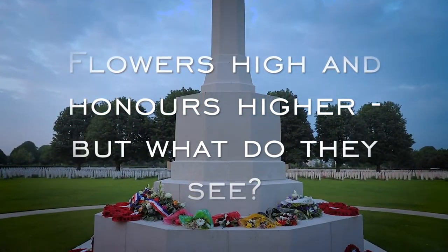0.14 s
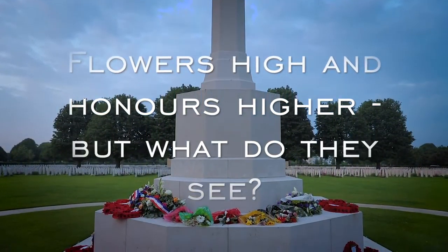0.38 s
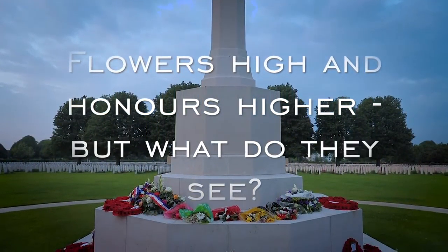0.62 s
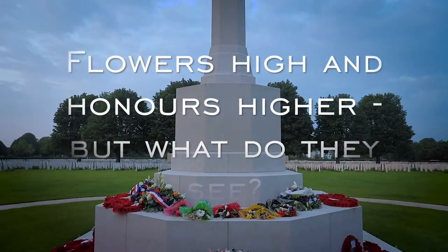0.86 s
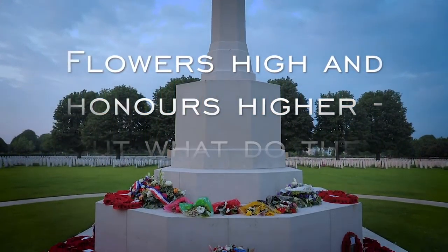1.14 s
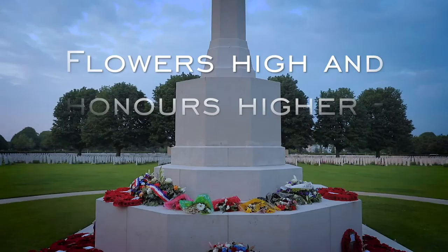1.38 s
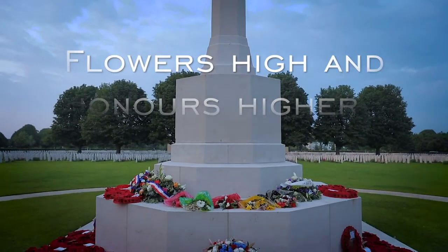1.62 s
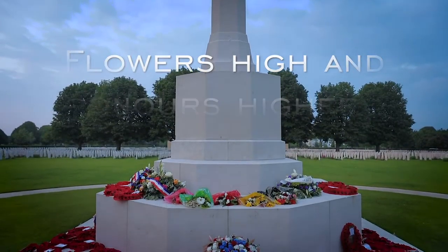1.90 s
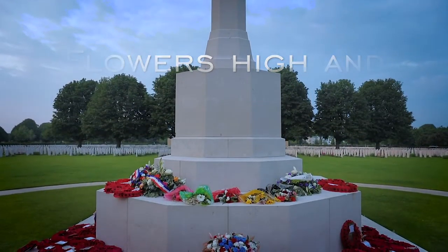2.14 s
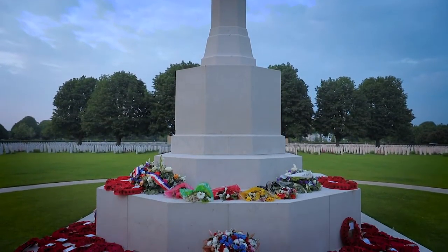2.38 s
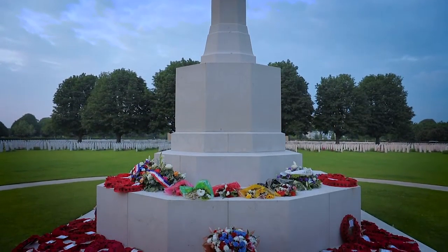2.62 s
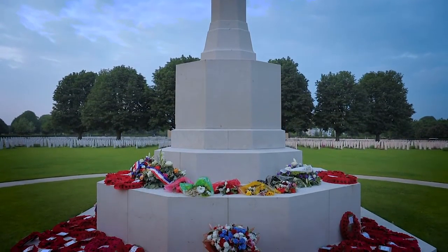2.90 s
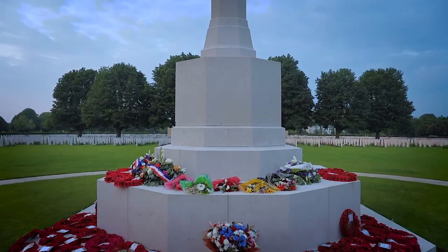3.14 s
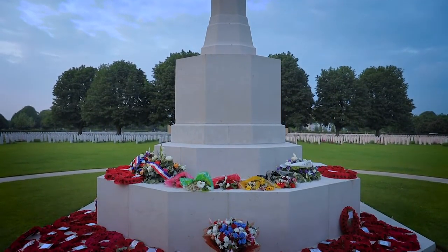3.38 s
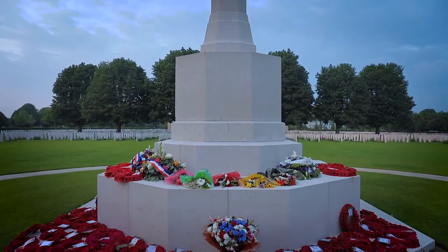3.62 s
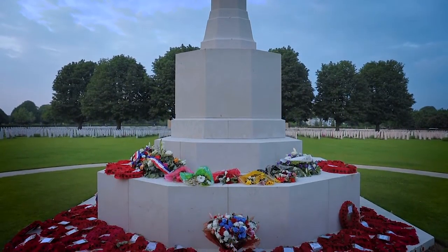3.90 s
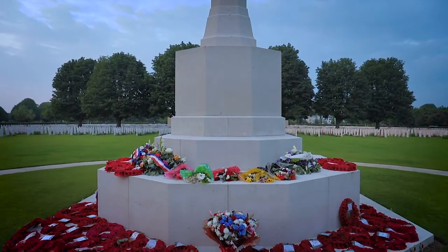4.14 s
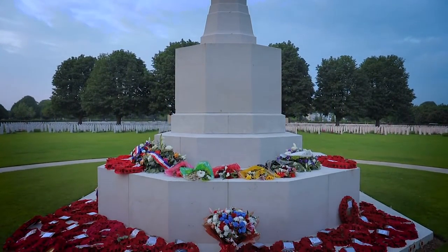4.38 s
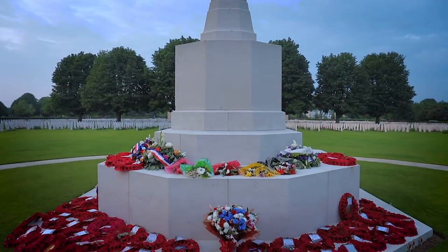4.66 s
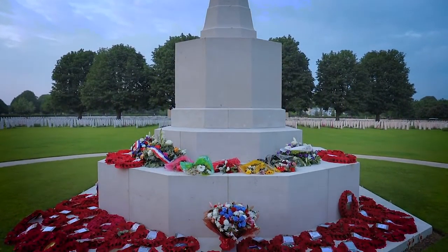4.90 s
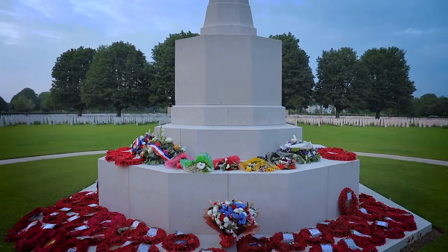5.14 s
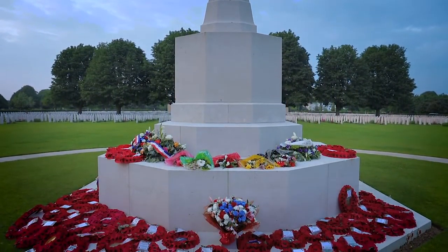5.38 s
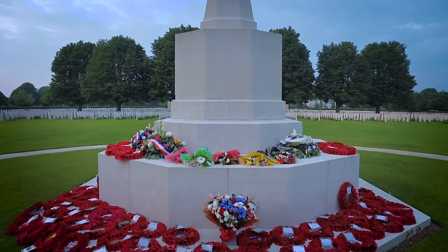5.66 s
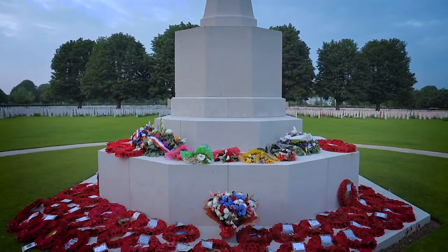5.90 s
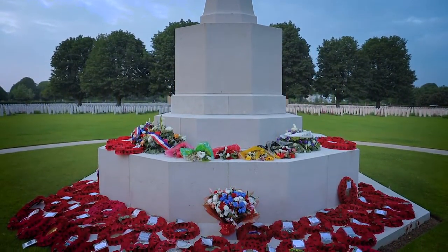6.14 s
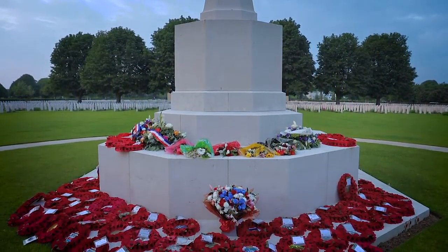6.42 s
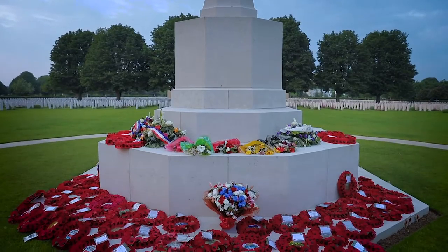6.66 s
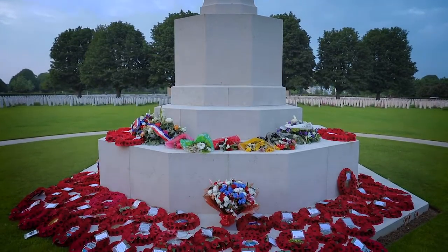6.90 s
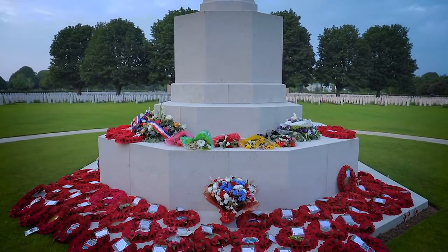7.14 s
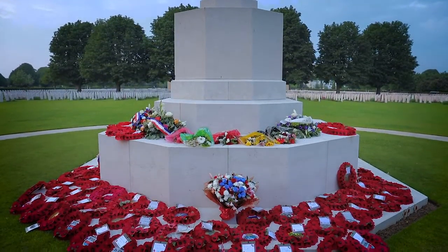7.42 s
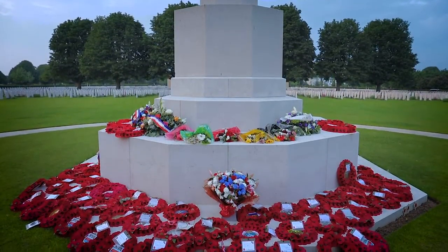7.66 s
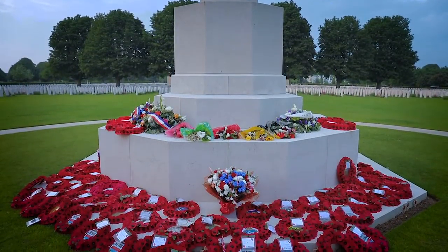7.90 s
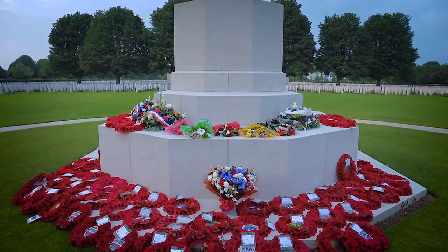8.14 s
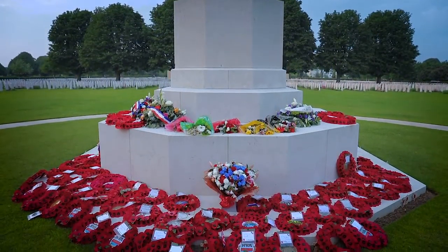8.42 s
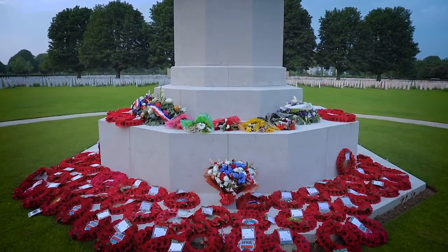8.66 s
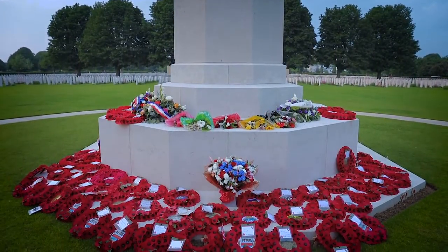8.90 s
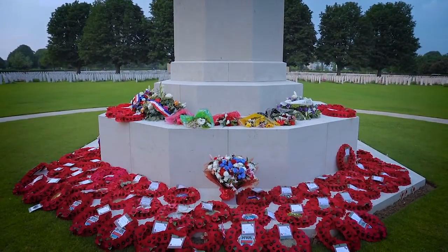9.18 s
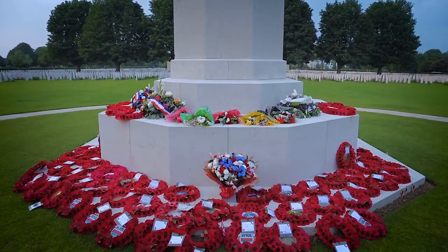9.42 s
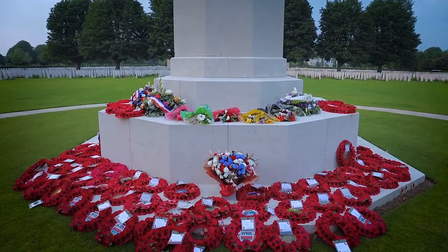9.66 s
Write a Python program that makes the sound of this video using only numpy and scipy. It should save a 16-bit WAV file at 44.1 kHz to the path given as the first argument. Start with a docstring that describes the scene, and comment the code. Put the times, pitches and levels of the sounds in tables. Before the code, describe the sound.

A steady, muted hiss of distant traffic and leaves runs throughout. At 0.2-0.6 s thin high notes sound with two hollow wooden knocks; a buzz and harsh chacks follow to 1.1 s. From 1.25 to 1.75 s come three wiggling syllables with buzzy tails, then crisp snaps. Two bright, very short pinks ring at 2.3 and 2.45 s beside a stronger knock. Two falling rattles come at 2.9-3.2 s, with more knocks, then clustered whistles until 4.1 s over faint hoarse calling. A strong dull snap lands at 4.2 s, followed by a sparser second. Chirps run 5.5-5.8 s over far chatter, throbbing trills 6.0-6.5 s, and the sharpest dull snap at 6.6 s. Dense whistles fill 6.9-7.4 s, then a loud chirp and chacks to 7.75 s. Sparse whistles, snaps and knocks follow, with quick flicked notes at 9.6 s. Only short diffuse scatter surrounds the calls.

```python
"""Among trees at dawn, songbirds overlap: whistles, buzzy trills and harsh chacks, with fainter notes and chatter.
Whistles are near sines along pitch lines, buzzes add modulation, and chacks and ticks are pulses through
throat resonances. Something hollow and wooden knocks now and then as decaying modes; distant traffic and
leaves hiss below as coloured noise. Trunks and foliage scatter the calls as a short noise tail, without
the knocks, a far hoarse calling and the hiss; the microphone chain cuts the bass and the top."""
import sys
import numpy as np
from scipy import signal
from scipy.fft import rfft, irfft
from scipy.io import wavfile
from scipy.ndimage import uniform_filter1d

SR = 44100
rng = np.random.default_rng(int(sys.argv[2]) if len(sys.argv) > 2 else 0)


def field_ratio(decibels):
    """Amplitude ratio for a level in dB (20 dB per decade); scalars and array-likes work."""
    return 10 ** (np.asarray(decibels, dtype=float) / 20)


def int16_out(signal):
    """Quantize to a 16-bit WAV file."""
    q = np.round(np.clip(np.atleast_2d(signal).T, -1, 1) * 32767)
    wavfile.write(sys.argv[1], SR, q.astype(np.int16))


N = 431738   # length in samples


def rms_one(x):
    """Normalisation: scale to unit root-mean-square."""
    return x / np.sqrt(np.mean(x ** 2) + 1e-20)


def add(out, s, x):
    """Superposition: mix x into out from s seconds on."""
    i = int(s * SR)
    out[i:i + len(x)] += x[:N - i]


def resonate(x, hz, width_hz):
    """Damped resonance: a two-pole filter with unit gain at its peak."""
    r = np.exp(-np.pi * width_hz / SR)
    zeros = np.array([1, 0, -1]) * (1 - r * r) / 2
    poles = [1, -2 * r * np.cos(2 * np.pi * hz / SR), r * r]
    return signal.lfilter(zeros, poles, x)


def drift(rate_hz, size):
    """Random fluctuation: white noise through a double low-pass, scaled to rms 1."""
    r = np.exp(-2 * np.pi * rate_hz / SR)
    settled = signal.lfilter([1], [1, -2 * r, r * r], rng.standard_normal(size + 4000))[4000:]
    return rms_one(settled)


def shaped(shape, s, length, first_hz, second_hz, db):
    """Scaling of a contour: stretch a note shape to its time, pitches and level."""
    return [(s + a * length, first_hz + b * (second_hz - first_hz), db + c) for a, b, c in shape]


def note(rows, throb=0, depth=0, swing_hz=0, edge=0.0024, waver_hz=30, upper_db=-17, sharp=1, sets_in=.002):
    """Frequency and amplitude modulation: the syrinx sings a near sine; in a buzz each throb is a sweep."""
    s, hz, db = np.transpose(rows)
    t = np.arange(s[0], s[-1], 1 / SR)
    glide = uniform_filter1d(np.interp(t, s, hz), size=110, mode="nearest")   # corners are rounded
    beat = 2 * np.pi * throb * (t - s[0]) + 0.34 * drift(39, size=len(t))
    buzz = np.clip((t - s[0]) / sets_in, 0, 1) ** 2
    pitch = glide + buzz * swing_hz * np.sin(beat) + waver_hz * drift(88, size=len(t))
    waver_db = 1.8 + depth   # a buzz is a little less steady
    level = field_ratio(np.interp(t, s, db) + waver_db * drift(110, size=len(t)))
    level = level * (1 - np.clip(depth * buzz, 0, 1) * np.cos(beat)) ** sharp
    fade = np.clip(np.minimum(t - s[0], s[-1] - t) / edge, 0, 1)
    phase = 2 * np.pi * np.cumsum(pitch) / SR
    # low notes carry a faint, breathy upper voice about a fifth above
    lowness = np.clip((3000 - glide) / 300, 0, 1)
    upper = field_ratio(upper_db) * lowness * np.sin(1.45 * phase + 2.8 * drift(120, size=len(t)))
    return np.sqrt(2) * level * fade * (np.sin(phase) + upper)


# Whistle contours. Each row: share of the length, share of the way from first to second pitch,
# level offset in dB.
SLIDE = [(0, 0, -6), (.5, .5, 0), (1, 1, -6)]   # a straight glide
SCOOP = [(0, 1.2, -8), (.22, 0.071, -0.5), (1, 1, -1)]   # scoops up to the first pitch, then sinks at even strength
ARCH = [(0, 0, -10.5), (.3, .7, -6.5), (.5, 0.93, -5.5), (.7, .7, -1), (1, 0.11, -8)]     # up and down again, loudest on the way down
SWOOP = [(0, 0.053, -22.5), (.62, 1, 4.5), (1, .95, -14)]   # falls, then levels out
FLICK = [(0, 0.032, -16), (.73, 0.23, -1), (1, 1, 2.5)]   # creeps up, then flips high
# Whistles of each contour. Each row: start in seconds, length in seconds, first pitch in Hz,
# second pitch in Hz, level in dB.
SLIDES = [(0.956, 0.025, 2564, 2740, -44), (2.077, 0.13, 2510, 4940, -42.5),
          (2.56, 0.045, 6000, 7030, -47.5), (2.739, 0.015, 2633, 2630, -28.5),
          (2.768, 0.016, 2700, 2580, -42.5), (3, 0.057, 3520, 3020, -50), (3.223, 0.014, 1820, 1300, -37.5),
          (3.623, 0.033, 2604, 2050, -46), (3.715, 0.023, 2500, 3700, -38), (3.796, 0.025, 3510, 3280, -33),
          (3.843, 0.046, 2990, 3230, -34), (3.866, 0.014, 1775, 1580, -29.5),
          (4.058, 0.083, 5850, 5000, -43), (4.338, 0.08, 3100, 3345, -44), (6.325, 0.021, 3300, 2520, -35),
          (6.345, 0.038, 3040, 3140, -42), (6.687, 0.074, 8820, 7500, -45), (6.768, 0.072, 8000, 7760, -48),
          (6.936, 0.019, 2130, 2750, -34.5), (6.962, 0.037, 2236, 2750, -28.5),
          (7.021, 0.021, 2180, 3700, -38), (7.053, 0.015, 3700, 5100, -44), (7.088, 0.047, 3100, 2664, -35),
          (7.194, 0.042, 2440, 2830, -35), (7.257, 0.045, 2900, 3060, -39.5),
          (7.354, 0.021, 2940, 2410, -26.5), (8.417, 0.033, 3900, 2700, -39),
          (8.433, 0.13, 2620, 2090, -37.5), (9.082, 0.13, 3240, 3810, -42.5),
          (9.219, 0.056, 5370, 6300, -50), (9.585, 0.027, 2780, 2330, -38.5),
          (9.613, 0.029, 2570, 2240, -29), (9.616, 0.025, 2810, 2700, -34.5),
          (9.643, 0.013, 2640, 2070, -33)]
SCOOPS = [(3.732, .024, 2695, 2294, -28.5), (3.773, 0.022, 2700, 2265, -27),
          (3.813, 0.0286, 2330, 1970, -31)]
ARCHES = [(0.202, 0.049, 5360, 6330, -33), (0.253, 0.045, 5210, 5980, -34),
          (2.093, 0.05, 5420, 6350, -44.5), (3.429, 0.062, 6040, 6900, -43.5),
          (3.478, 0.066, 6330, 7470, -46), (3.758, 0.019, 3950, 4090, -32),
          (3.987, 0.037, 5170, 6000, -39.5), (4.021, 0.052, 5350, 5900, -38.5),
          (5.901, 0.12, 2970, 3300, -42.5), (6.715, 0.074, 7530, 8230, -45),
          (6.904, 0.0257, 2113, 2670, -34), (7.056, 0.035, 3000, 3385, -26),
          (6.98, 0.073, 3850, 4450, -43.5), (7.213, 0.053, 4426, 4870, -45.5),
          (7.292, 0.049, 3210, 3680, -21.5)]
SWOOPS = [(2.627, 0.1, 7400, 5660, -38.5), (3.547, 0.061, 8100, 6500, -42.5),
          (3.6, 0.05, 8250, 6360, -35.5)]
FLICKS = [(9.552, .028, 1727, 3210, -30.5), (9.68, 0.025, 1615, 3050, -31)]


def whistles():
    """Pure-tone phonation: each whistle follows one of five pitch contours."""
    out = np.zeros(N)
    groups = (SLIDE, SLIDES), (SCOOP, SCOOPS), (ARCH, ARCHES), (SWOOP, SWOOPS), (FLICK, FLICKS)
    for shape, table in groups:
        for row in table:
            add(out, row[0], note(shaped(shape, *row)))
    return out


# A lead note, two quick dips, a climb. Each row: time in seconds before stretching,
# share from dip to lead pitch, level offset in dB.
ZIGZAG = [(0, 0.65, -7.5), (.024, 1, -6), (.031, -.1, -3.5), (.041, 0.55, 4), (.044, 1.0, -11),
          (.048, .1, 4.5), (.07, 1.7, -23)]
# The syllables. Each row: start in seconds, dip pitch in Hz, lead pitch in Hz, level in dB.
ZIGZAGS = [(1.252, 2000, 3100, -35.5), (1.442, 1537, 3250, -34), (1.62, 2105, 2900, -30.5)]


def zigzags():
    """Rapid frequency modulation: syllables that dip twice and climb."""
    out = np.zeros(N)
    for s, dip_hz, lead_hz, db in ZIGZAGS:
        add(out, s, note(shaped(ZIGZAG, s, 0.94, dip_hz, lead_hz, db)))
    return out


# A pitch that jumps up and sags. Each row: share of the length, share of the top pitch, level offset in dB.
BURR = [(0, .88, -5.5), (.22, 1, -1.5), (.7, 0.93, 1), (1, 0.92, -5)]
# Buzzy notes. Each row: start in seconds, length in seconds, top of the glide in Hz, level in dB,
# throbs per second, pitch swing in Hz.
BURRS = [(0.833, .12, 6240, -40, 110, -420), (1.331, 0.045, 3900, -37, 62, -400),
         (1.5, 0.06, 3954, -35.5, 94, 99), (1.68, 0.053, 4045, -36, 230, 177),
         (7.027, 0.025, 3780, -33, 140, 200), (7.249, 0.027, 4050, -37.5, 130, 253)]


def burrs():
    """Vibrato with tremolo: burrs shake in pitch and throb in level."""
    out = np.zeros(N)
    for s, length, hz, db, throb, swing_hz in BURRS:
        add(out, s, note(shaped(BURR, s, length, 0, hz, db), throb, depth=0.42, swing_hz=swing_hz))
    return out


# A fall, then a low tail that bends up. Each row: share of the length,
# share of the way from first to second pitch, level offset in dB.
HOOK = [(0, 0.0048, -8), (.31, 0.99, 0), (.66, 0.9, -9), (1, .86, -10.5)]
# The rattles. Each row: start in seconds, length in seconds, first pitch in Hz, second pitch in Hz,
# level in dB, throbs per second.
RATTLES = [(2.86, .162, 4200, 2430, -32, 160), (3.065, .16, 3810, 2356, -31.5, 160)]


def rattles():
    """Amplitude modulation: a falling note breaks gradually into throbs."""
    out = np.zeros(N)
    for *row, throb in RATTLES:
        rows = shaped(HOOK, *row)
        add(out, row[0], note(rows, throb, depth=0.72, swing_hz=70, sets_in=0.056, sharp=1.37))
    return out


# Throbbing trills. Each row: start in seconds, length in seconds, first pitch in Hz, second pitch in Hz,
# level in dB, throbs per second.
TRILLS = [(6.035, 0.13, 3700, 3700, -41, 81.5), (6.166, 0.18, 3700, 3477, -32, 86.2),
          (6.377, 0.032, 6050, 4540, -42, 192), (6.384, 0.097, 3840, 3364, -40, 114),
          (6.442, 0.06, 2674, 2540, -37.5, 124.4)]


def trills():
    """Deep amplitude modulation: a trill swells, then sinks over its last quarter."""
    out = np.zeros(N)
    for s, length, first_hz, second_hz, db, throb in TRILLS:
        swell_db = 75 * length   # longer trills swell by more
        rows = [(s, first_hz, db - swell_db),
                (s + .75 * length, second_hz, db),
                (s + length, second_hz, db - 3.5)]
        add(out, s, note(rows, throb, depth=0.96, swing_hz=89, waver_hz=60, sharp=2.12))
    return out


# A rising note. Each row: time in seconds before stretching, share of the top pitch, level offset in dB.
TSIP = [(0, .87, -15), (.02, 1, 3.5), (.032, .99, 4.5), (.04, .98, -13)]
# The note sung five times. Each row: start in seconds, top pitch in Hz, level in dB.
TSIPS = [(0.331, 5690, -44), (0.388, 5540, -40), (0.445, 5410, -40), (0.513, 5400, -42),
         (0.578, 5550, -42.5)]


def tsips():
    """Upward frequency glide: one short rising note, sung five times."""
    out = np.zeros(N)
    for s, hz, db in TSIPS:
        add(out, s, note(shaped(TSIP, s, 0.85, 0, hz, db)))
    return out


# Throat resonances. Each row: frequency in Hz, width in Hz of each of two cascaded filters, gain in dB.
THROAT = [(2500, 314, 6), (3700, 410, 2.5), (5540, 1030, -2.5)]


def rasp(size, per_s=3000):
    """Source and filter: uneven random pulses ring the throat; rms 1."""
    pulses = rng.standard_normal(size) * (rng.random(size) < per_s / SR)
    return rms_one(sum(field_ratio(g) * resonate(resonate(pulses, hz, w), hz, w) for hz, w, g in THROAT))


def short_calls(rows, start_hz, end_hz, length, rise, lag, rasp_db, rough):
    """Tone plus noise: a grainy tone slides within the call, under a rasp that sets in first."""
    out, t = np.zeros(N), np.arange(2600) / SR
    attack = np.clip(t / rise, 0, 1)
    dying = np.exp(-((t - lag) / length) ** 2)
    lingering = np.exp(-(0.47 * t / length) ** 2)   # envelope of the rasp
    for s, db in rows:
        slide = np.interp(t, [0, lag + 1.21 * length], [start_hz, end_hz])
        pitch = rng.uniform(0.9, 1.04) * slide
        tone = np.sin(2 * np.pi * np.cumsum(pitch) / SR + rough * drift(170, size=len(t)))
        add(out, s - rise, field_ratio(db) * attack * (dying * tone + field_ratio(rasp_db) * lingering * rasp(size=len(t))))
    return out


# Harsh chacks. Each row: time in seconds, level in dB.
CHACKS = [(0.688, -37.5), (0.9828, -38.5), (1.043, -40), (5.1612, -38), (5.8637, -40.5), (6.6068, -41),
          (7.526, -31), (7.6919, -32.5), (7.7287, -31)]


def chacks():
    """Broadband excitation: a strong rasp over a falling tone."""
    return short_calls(CHACKS, start_hz=2900, end_hz=2000, length=0.00864, rise=0.0025, lag=0.0111,
                       rasp_db=-3.5, rough=0.87)


# Falling chirps. Each row: time in seconds, level in dB.
CHIRPS = [(5.5169, -31), (7.4061, -36.5), (7.5574, -24)]


def chirps():
    """Downward frequency glide: a falling tone with a weaker rasp."""
    return short_calls(CHIRPS, start_hz=2700, end_hz=1390, length=0.009, rise=0.0021, lag=0.0069,
                       rasp_db=-10.5, rough=0.44)


# Chirps in two parts. Each row: time in seconds, level in dB.
DOUBLE_CHIRPS = [(5.581, -34.5), (5.649, -37), (5.713, -32.5), (5.791, -32.5)]


def double_chirps():
    """Two successive glides: a rising pip, then a steep fall."""
    out = short_calls(DOUBLE_CHIRPS, start_hz=3000, end_hz=1450, length=0.0051, rise=.002, lag=.004,
                      rasp_db=-7, rough=0.35)
    for s, db in DOUBLE_CHIRPS:
        add(out, s - .011, note([(0, 2410, db - 8), (.008, 2820, db - 3.5)], edge=0.002))
    return out


# Sharp pinks. Each row: time in seconds, level in dB.
PINKS = [(2.3284, -18.5), (2.4467, -16.5)]


def pinks():
    """Upward frequency glide: a very short, nearly pure rising tone."""
    return short_calls(PINKS, start_hz=2330, end_hz=3100, length=0.0023, rise=0.0034, lag=0.0019,
                       rasp_db=-27.0, rough=0.35)


def ticks(rows, top_hz, decay):
    """Impulsive excitation: the bill snaps, a brief dense burst that rings the throat."""
    out, t = np.zeros(N), np.arange(600) / SR
    envelope = np.clip(t / 0.0013, 0, 1) * np.exp(-t / decay)
    for s, db in rows:
        add(out, s, field_ratio(db) * envelope * rasp(size=len(t), per_s=12000))
    return signal.sosfilt(signal.butter(8, top_hz, fs=SR, output="sos"), out + 1e-18)


# Bright bill snaps, then dull ones without the treble. Each row: time in seconds, level in dB.
TICKS = [(1.8412, -32.5), (1.9403, -35.5), (4.334, -28.5), (6.949, -30.5), (8.626, -33.5), (8.704, -38)]
DULL_TICKS = [(4.2264, -17.5), (6.58, -12.5), (9.4225, -26)]


def bill_snaps():
    """Low-pass filtering: bright and dull snaps differ in treble limit and decay."""
    return ticks(TICKS, top_hz=9500, decay=0.0034) + ticks(DULL_TICKS, top_hz=4050, decay=0.0024)


# A hollow wooden body's modes. Each row: frequency in Hz, mean level in dB, 60 dB decay time in seconds.
WOOD = [(597.2, -6, 0.12), (739.7, 6, 0.048), (1051, -2.5, 0.066), (1320, -15.5, 0.068),
        (2240, -24.5, 0.099)]
# The blows. Each row: time in seconds, level in dB before a common 2 dB cut.
KNOCKS = [(0.32, -21), (0.557, -22.5), (1.117, -29.5), (1.817, -22.5), (2.377, -16.5), (2.514, -29.5),
          (3.167, -17.5), (3.382, -20), (4.293, -27), (4.8, -27.5), (6.352, -22.5), (6.89, -31),
          (7.911, -22), (9.357, -21)]


def knocks():
    """Modal ringing: a soft blow excites a hollow wooden body, a little differently each time."""
    out, t = np.zeros(N), np.arange(6000) / SR
    for s, db in KNOCKS:
        ring = np.zeros(len(t))
        for hz, g, t60 in WOOD:
            ring += field_ratio(g + rng.normal(0, 1.5) - 60 * t / t60) * np.sin(2 * np.pi * hz * t)
        add(out, s - .001, field_ratio(db - 2.0) * ring * np.clip(t / 0.0042, 0, 1))
    return out


# Nearly level, mostly faint notes, one doubled about an octave above.
# Each row: start in seconds, length in seconds, pitch in Hz, level in dB.
FAINT_NOTES = [(0.302, 0.11, 2356, -56.5), (1.368, 0.071, 2340, -54), (1.705, 0.053, 2871, -56),
               (2.53, 0.095, 3290, -59), (3.22, 0.16, 3100, -55), (3.477, 0.041, 2660, -46.5),
               (3.555, 0.089, 2663, -46), (5.66, 0.095, 2830, -53), (6.698, 0.076, 2705, -42.5),
               (6.777, 0.11, 2700, -56.5), (6.927, 0.048, 4700, -52), (8.196, 0.097, 3915, -65),
               (8.691, 0.088, 3830, -65), (8.948, 0.12, 3140, -57), (8.95, 0.13, 6260, -68)]
# Far chatter. The one row: start in seconds, end in seconds, level in dB.
CHATTER = (5.3, 6.12, -53.5)


def faint_birds(count=22):
    """Tonal and random sequences: nearly level notes, and steep falling strokes at random times and pitches."""
    out = np.zeros(N)
    for s, length, hz, db in FAINT_NOTES:
        add(out, s, note([(s, hz, db), (s + length, .99 * hz, db)], edge=0.0029))
    start, end, db = CHATTER
    for when, high in rng.random((count, 2)):
        s, hz = start + when * (end - start), 2600 * 2 ** high
        add(out, s, note([(s, 1.18 * hz, db), (s + 0.013, hz, db)]))
    return out


# A far hoarse calling. Each row: start in seconds, end in seconds, level in dB before the waver.
FAR_HOARSE = [(2.19, 4.008, -53.5), (7.902, 8.535, -53)]


def far_hoarse(hz=1370, width_hz=260):
    """Narrow-band noise: a wavering resonance that comes and goes."""
    t = np.arange(N) / SR
    gate = sum(field_ratio(db) * np.clip(np.minimum(t - a, b - t) / 0.027, 0, 1) for a, b, db in FAR_HOARSE)
    band = resonate(resonate(rng.standard_normal(N), hz, width_hz), hz, width_hz)
    return gate * field_ratio(3.2 * drift(6.9, size=N)) * rms_one(band)


def trees(x, t60=0.085, first=0.004):
    """Diffuse scattering: countless small reflections, a dying, clumpy tail after the nearest trunk."""
    t = np.arange(SR // 2) / SR
    decay = field_ratio(-60 * t / t60 + 4.5 * drift(54, size=len(t)))
    tail = rng.standard_normal(len(t)) * decay * (t > first)
    return signal.fftconvolve(x, tail / np.linalg.norm(tail))[:N]


# The spectrum of distant traffic and leaves. Each row: frequency in Hz, relative level in dB per Hz.
HISS = [(230, -56), (340, -33), (590, -2), (730, 0.5), (1100, -8.5), (2000, -17.5), (4500, -24),
        (9000, -28.5)]
HISS_DB = -45.0   # rms level in dB


def hiss():
    """Spectral shaping: steady white noise takes a smooth colour."""
    hz, (at_hz, db) = np.arange(N // 2 + 1) * SR / N, np.transpose(HISS)
    colour = field_ratio(np.interp(np.log(hz + 1), np.log(at_hz), db))
    return field_ratio(HISS_DB) * rms_one(irfft(rfft(rng.standard_normal(N)) * colour, N))


def scene():
    """Superposition: birds with their scatter, dry knocks and far hoarse calling, over the hiss."""
    songs = whistles() + zigzags() + burrs() + rattles() + trills() + tsips()
    brief = chacks() + chirps() + double_chirps() + pinks() + bill_snaps()
    calls = songs + brief + faint_birds()
    scatter = field_ratio(-11) * trees(calls)
    return (calls + scatter + knocks() + far_hoarse() + hiss())[None]


def roll_off(x):
    """The treble ends steeply here."""
    return signal.sosfilt(signal.butter(12, 9140, fs=SR, output="sos"), x)


def record(dry):
    """Band limiting: a steep bass cut, very faint white noise and a wall at the top."""
    x = signal.sosfilt(signal.butter(4, 330, "high", fs=SR, output="sos"), dry)
    x = x + field_ratio(-85.0) * rng.standard_normal(x.shape)
    x = signal.sosfilt(signal.ellip(12, .5, 44, 8950, fs=SR, output="sos"), x)   # cutoff in Hz
    return roll_off(x)


dry = scene()
out = record(dry)
int16_out(out)
```